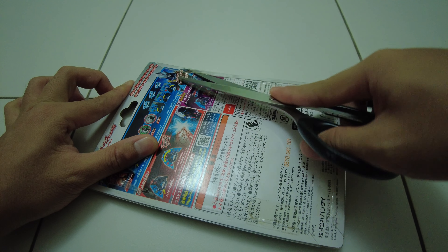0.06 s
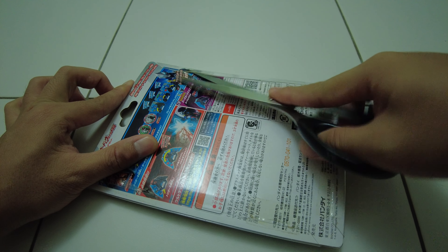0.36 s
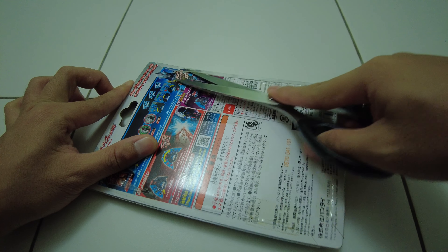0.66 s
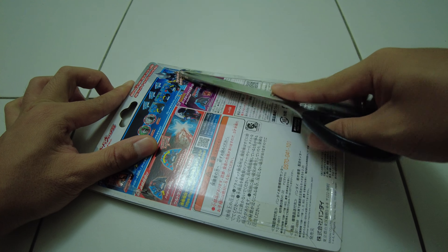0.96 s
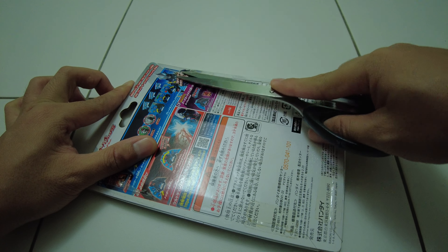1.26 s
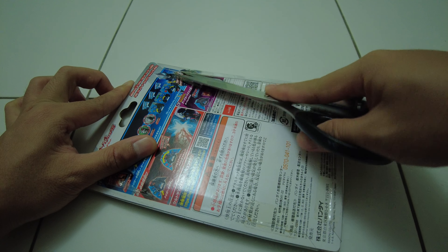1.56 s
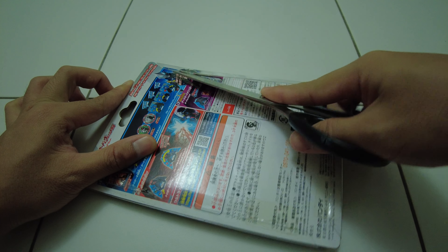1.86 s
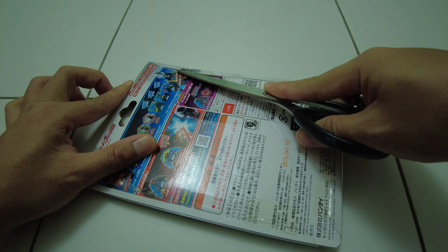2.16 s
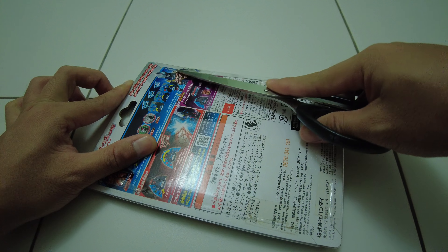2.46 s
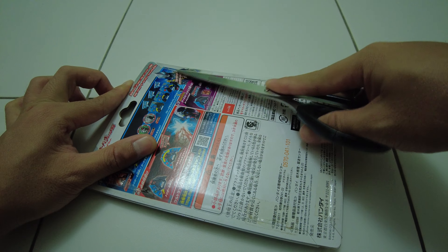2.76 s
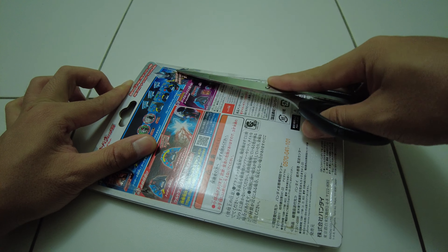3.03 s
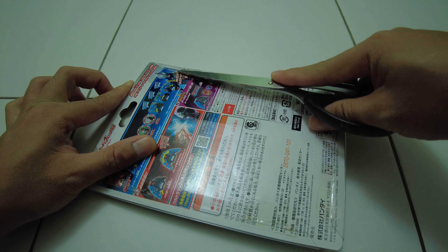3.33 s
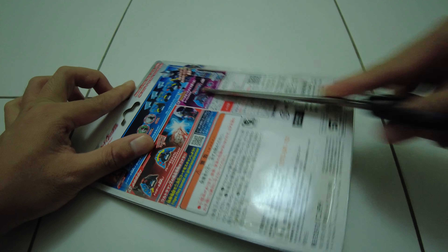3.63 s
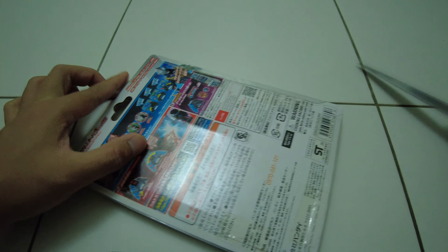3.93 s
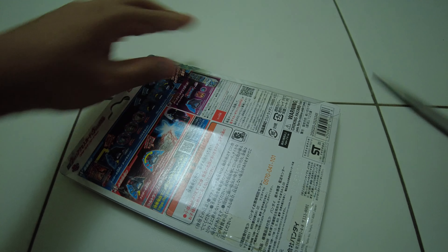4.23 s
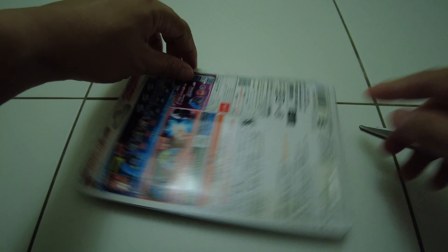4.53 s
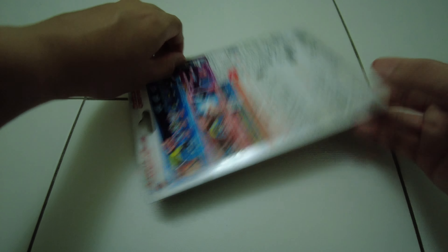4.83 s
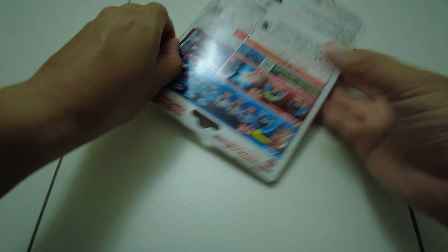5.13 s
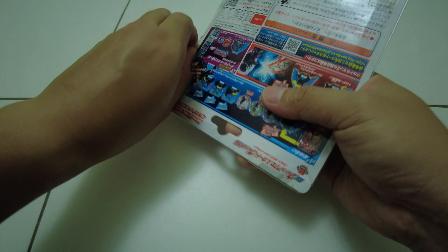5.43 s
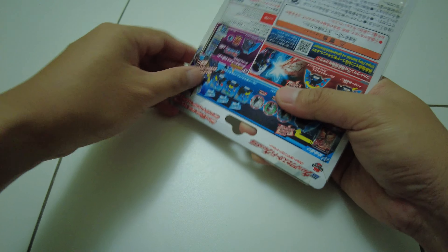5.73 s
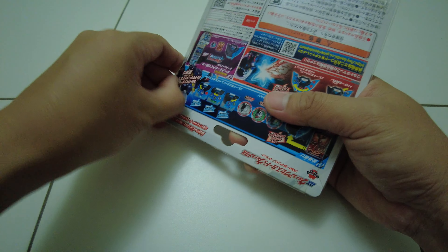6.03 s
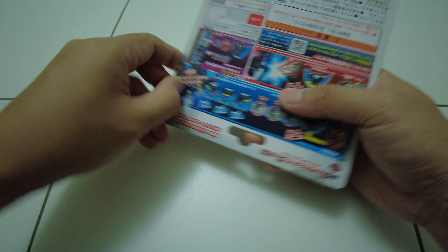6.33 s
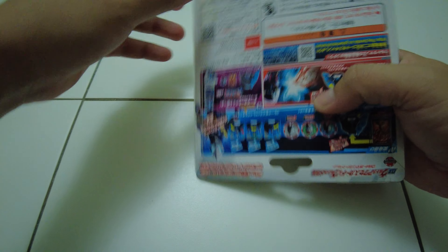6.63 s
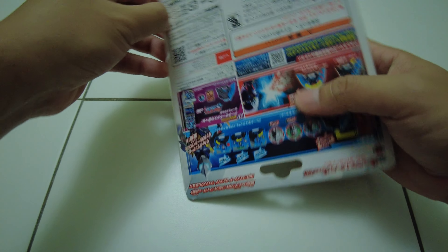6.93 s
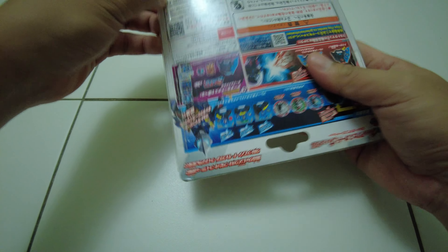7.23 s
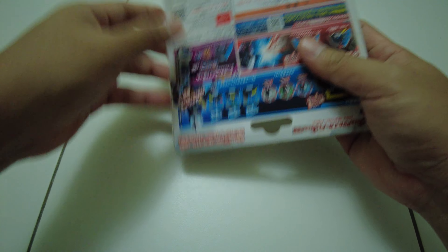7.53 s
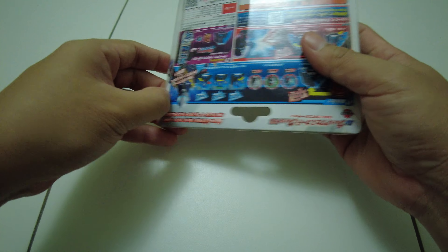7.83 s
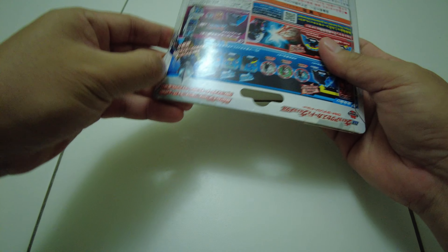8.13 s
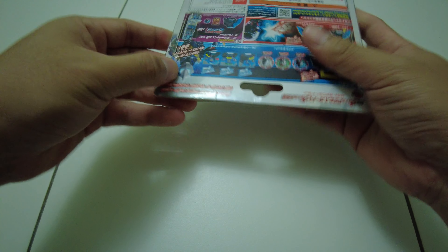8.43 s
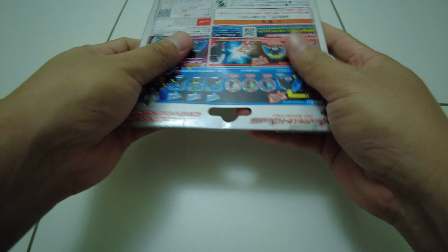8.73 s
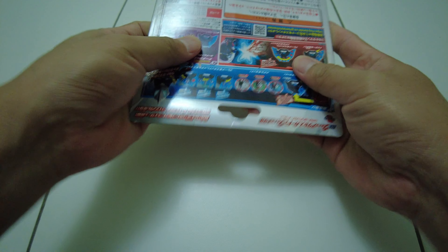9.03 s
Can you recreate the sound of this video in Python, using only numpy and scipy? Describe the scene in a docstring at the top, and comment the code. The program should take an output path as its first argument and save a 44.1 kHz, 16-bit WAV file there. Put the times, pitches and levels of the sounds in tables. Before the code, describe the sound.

Soft chewing of scissor blades on stiff packaging grows into four crackling snips and a tug with a light thump. The scissors clatter onto tile and scrape a short way. Then the plastic pack is handled, with one sharp pop, light rubbing and scattered small clicks. Everything is close, in a small echoing tiled room with a steady low rumble and hum.

```python
"""Steel scissors chew, then snip through a card and plastic pack, close to the microphone.
Each bite shears the card in tiny jerks that make the pack ring, while its fibres crackle.
The scissors are pulled free, put down on floor tiles with a clink and slid away.
Hands turn and flex the pack: it rustles as it rubs, clicks as it buckles, and its dome pops once.
A small tiled room echoes it all, over a low rumble and hum."""
import sys
import numpy as np
from scipy import signal
from scipy.fft import rfft, irfft
from scipy.io import wavfile

SR = 44100
rng = np.random.default_rng(int(sys.argv[2]) if len(sys.argv) > 2 else 0)


def store_wav(level_fs):
    """Save 16-bit WAV to argv[1]."""
    pcm = np.round(np.clip(np.atleast_2d(level_fs), -1, 1) * 32767)
    wavfile.write(sys.argv[1], SR, pcm.T.astype(np.int16))


N = 400408
T = np.arange(N) / SR
HZ = np.fft.rfftfreq(4096, 1 / SR)  # the frequencies at which filters are drawn
LEAD_S = .012  # a faint, soft noise swells this long before each click's peak

# Snips, each a grab, then a squeeze until the card breaks: grab t/s, grab level/dB, break t/s,
# squeeze level/dB, break level/dB, squeezed fibres level/dB, strain relative to grab and squeeze/dB
SNIPS = [(2.307, -32.5, 2.475, -30, -39, -48.5, -12.5), (2.6085, -32, 2.7063, -30.5, -30.5, -49.5, -27.5),
         (2.842, -28.5, 3.0292, -29.5, -32.5, -43.5, -12), (3.131, -29, 3.2397, -31, -25, -37.5, -11.5)]
# Tone colour of the plastic sheet: f/Hz, level/dB
SHEET = [(80, -28), (300, -15), (550, -6), (900, -3), (1600, -1.5), (2100, -7), (3100, -5.5), (4200, -23.5),
         (8000, -34.5), (16000, -48.5)]


def cutting():
    """Each bite shears the card in jerks that ring the pack; fibres crackle and edge scrapes on edge."""
    jerks = grit(per_s=1800, spread_db=4, apart=.4)
    body, tear_power, wiping = np.zeros((2, N)), np.zeros(N), np.zeros(N)
    for s, card_db, rise_s, fall_s, fibre_db in bites():
        near = abs(T - s) < .25
        bite = np.exp(np.minimum((T[near] - s) / rise_s, (s - T[near]) / fall_s))
        shear = unit(through(bite * jerks[:, near], pack_ring(1 + 0.0151 * rng.uniform(-1.3, 1))))
        add(body, T[near][0], gain_of(card_db) * np.linalg.norm(bite) * shear)
        tear_power[near] += (gain_of(fibre_db) * bite) ** 2
        wiping[near] = np.maximum(wiping[near], gain_of(-65.5) * bite)
    wiping += np.sqrt(stroke_power([(3.42, .09, -64)]))  # the blades ease open after the last snip
    for grab_s, grab_db, break_s, _, break_db, _, _ in SNIPS:
        for s, db in [(grab_s, grab_db - 8.5), (break_s, break_db)]:  # the edges catch, the card breaks
            snap = noisy_click(t60=0.011, share=1.0, lead=0.83, channels=1)
            add(body, s - LEAD_S, blow(db, through(snap, pack_ring(0.9815))))
    # Tone colour of tearing fibres: f/Hz, level/dB
    fibres = [(200, -40), (1900, -1), (3000, 5), (3900, -4.5), (4700, -1.5), (7000, -5.5), (10000, -12),
              (16000, -10)]
    crackle = through(np.sqrt(tear_power) * grit(per_s=800, spread_db=4, apart=1), tone_filter(fibres))
    scrape = through(wiping * grit(per_s=640, spread_db=2.5, apart=1), filter_of(peak(3137, width=380)))
    return body + crackle + scrape


def bites():
    """Every push of the blades on the card: t/s, card level/dB, rise/s, fall/s, fibre level/dB."""
    # The blades gnaw at the tough rim without getting through: t/s, level/dB
    gnaws = [(.32, -56.5), (.44, -56), (.58, -55.5), (.69, -57.5), (.89, -54), (1.035, -48.5), (1.30, -60),
             (1.51, -56.5), (1.63, -59.5), (1.745, -55.5), (1.87, -58), (2.0, -56.5), (2.135, -51.5)]
    # The blades are tugged out of the slit: t/s, card level/dB, fibre level/dB
    tugs = [(3.609, -34, -46), (3.624, -31.5, -30.5), (3.658, -34.5, -34), (3.676, -34.5, -36)]
    grab_rise_s, squeeze_fall_s, strain_s, fibre_offset_db = 0.0037, 0.00558, 0.0265, -18.5
    for s, db in gnaws:
        yield s, db, 0.0283, 0.0285, db - 8.5
    for grab_s, grab_db, break_s, squeeze_db, _, fibre_db, strain_db in SNIPS:
        squeeze_s = break_s - 0.00421
        # a weaker strain fades after the sharp grab and builds again toward the squeeze
        fading_db, building_db = grab_db + strain_db, squeeze_db + strain_db
        yield grab_s, grab_db, grab_rise_s, .014, grab_db + fibre_offset_db
        yield grab_s, fading_db, grab_rise_s, strain_s, fading_db + fibre_offset_db
        yield squeeze_s, building_db, strain_s, squeeze_fall_s, building_db + fibre_offset_db
        yield squeeze_s, squeeze_db, 0.0106, squeeze_fall_s, fibre_db
    for s, db, fibre_db in tugs:
        yield s, db, 0.0058, 0.01013, fibre_db


def pack_ring(pitch_ratio):
    """The ring of the pack, its notes shifted by where it is gripped."""
    # Notes of the pack held in the blades: f/Hz, width/Hz, level/dB
    notes = [(536.3, 217, -16.5), (828, 148, -0.52), (1023.6, 115, 1), (1321.2, 160, -3.5), (1529, 170, -5),
             (3053, 580, -24.5), (4660, 300, -27)]
    return filter_of(sum(gain_of(db) * peak(hz * pitch_ratio, width) for hz, width, db in notes))


def scissors_on_tile():
    """Blows and a gritty slide shake the blades: a hard clack and a short ring, damped by the tile."""
    # Steel strikes tile: t/s, level/dB, time for its noise to fade by 60 dB/s
    clinks = [(4.0026, -20.5, 0.0161), (4.0233, -26, 0.026), (4.0309, -30.5, 0.096), (4.189, -28, 0.039),
              (4.3298, -20.5, .014), (4.354, -32.5, .03), (4.376, -37, 0.0094), (4.3924, -44.5, 0.017)]
    # Notes of the blades: f/Hz, level/dB
    blades = [(1205, -10.5), (2860, -5), (3273, -7), (4392, -8.5), (4995, -8.5), (5426, -7.5), (6459, -5.5),
              (7665, -2.5), (9388, -6), (10335, -3), (10852, -2), (12403, -3), (14728, -3.5), (15073, -4),
              (15590, -1)]
    # Tone colour of the clack: f/Hz, level/dB
    steel = [(100, -25.5), (800, -20.5), (2200, -8.5), (2900, -1.5), (4200, -4.5), (6500, 2), (9000, 0),
             (12500, 3.5), (15700, 3)]
    drive = sliding()
    for s, db, t60 in clinks:
        add(drive, s - LEAD_S, blow(db, noisy_click(t60, share=4.5, lead=0.0504)))
    t = np.arange(SR // 4) / SR
    ring = sum(gain_of(db) * np.sin(2 * np.pi * (hz * t + rng.random((2, 1)))) for hz, db in blades)
    response = gain_of(-17) * unit(ring * fade(t, t60=0.077))
    blade_peaks = sum(gain_of(db) * peak(hz, width=115) for hz, db in blades)
    add(response, 0, tone_filter(steel, boost=1.93 * blade_peaks))
    left, right = through(drive, response)
    # the highest notes reach the far, left microphone weakest
    shade = filter_of(gain_of(-3 * (HZ / HZ[-1] * 2) ** 2))
    return np.array([gain_of(-2) * through(left, shade)[0], gain_of(2) * right])


def sliding(from_s=4.298, to_s=4.4085, sag_db_per_s=21.5):
    """The scissors are pushed over gritty tile, slow down as they go and coast to a stop."""
    # Tone colour of the grit under the blades: f/Hz, level/dB
    tile_grit = [(1000, 1), (2400, -1), (3000, 6), (4200, 1.5), (9000, 1), (13000, 2)]
    attack = np.exp(np.minimum(T - from_s, 0) / .006)
    sag = gain_of(-sag_db_per_s * np.maximum(T - from_s, 0))
    release = np.exp(-np.maximum(T - to_s, 0) / 0.0445)
    friction = gain_of(-32.5) * attack * sag * release * grit(per_s=2900, spread_db=3.5, apart=1.2)
    return through(friction, tone_filter(tile_grit))


def popping(at_s=5.4705):
    """The dome flips in one jerk: a note goes mostly to the microphone, a crack mostly into the room."""
    # Notes of the plastic dome: f/Hz, width/Hz, level/dB
    dome_notes = [(965, 290, -1), (1774, 940, -10.5), (2800, 820, -10), (5294, 1300, -14),
                  (7707, 2400, -1.5), (12500, 4000, -21.5)]
    # Tone colour of the crack: f/Hz, level/dB
    crack_colour = [(200, -30), (900, -7.5), (1650, 2), (2300, -4.5), (3900, -0.5), (5200, 0),
                    (9000, -4), (15000, -10)]
    dome = filter_of(sum(gain_of(db) * peak(hz, width) for hz, width, db in dome_notes))
    note, crack = np.zeros((2, 2, N))
    flip = noisy_click(t60=0.026, share=.8, lead=.4)
    add(note, at_s - LEAD_S, blow(-21.6, through(flip, dome)))
    snap = noisy_click(t60=0.011, share=2, lead=0)
    add(crack, at_s - LEAD_S, blow(-18.5, through(snap, tone_filter(crack_colour))))
    return note + 0.23 * crack, crack + .3 * note


def clicking():
    """Plastic clicks: a bright tick at the crease and a short hollow note from the sheet round it."""
    # Tone colour of the tick: f/Hz, level/dB
    tick_colour = [(200, -32.5), (1500, -32), (3500, -1.5), (6000, 0), (10000, -4.5), (16000, -6.5)]
    base_hz = 1029.7  # SHEET is the colour at this note, and shifts with the note
    out = np.zeros((2, N))
    for s, note_db, note_hz, tick_db, tick_hz in clicks():
        colour = gain_of(read(SHEET, HZ * np.sqrt(base_hz / note_hz)))
        sheet = filter_of(colour * (1 + 2.8 * peak(note_hz, width=note_hz / 3)))
        crease = tone_filter(tick_colour, boost=1.7 * peak(tick_hz, width=1600))
        note = through(noisy_click(t60=0.04, share=1.1, lead=.4, channels=1), sheet)
        tick = through(noisy_click(t60=0.025, share=2.1, lead=0.3), crease)
        add(out, s - LEAD_S, blow(note_db, note) + blow(tick_db, tick))
    return out


def clicks(crease_hz=4464):
    """Every click of plastic: t/s, note level/dB, note f/Hz, tick level/dB, tick f/Hz."""
    # The sheet buckles: t/s, note level/dB, tick level/dB
    buckles = [(0.2724, -54, -74), (0.4526, -42, -52), (.5566, -36.5, -60.5), (0.727, -53.5, -63),
               (0.8572, -46, -66.5), (1.3572, -52, -66), (1.5982, -39, -59), (2.4932, -45, -43),
               (3.5783, -42, -49), (3.624, -34, -35.5), (3.6859, -31, -41), (4.724, -39.5, -55.5),
               (4.7386, -43.5, -58.5), (4.963, -39.5, -49), (5.0403, -46.5, -63.5), (5.351, -42.5, -55.5),
               (5.3938, -39, -47), (5.658, -48.5, -51.5), (6.4508, -49.5, -51.5), (6.7796, -40.5, -47.5),
               (6.8147, -38.5, -49.5), (7.4997, -44, -45.5), (8.768, -53, -61.5)]
    # A stiff edge flicks, hardly moving the sheet: t/s, level/dB, f/Hz
    flicks = [(.068, -60, 8130), (1.397, -56, 14000), (5.2083, -37, 7360), (5.5907, -41.5, 4900),
              (6.0594, -53.5, 4997), (6.8603, -53.5, 14100), (7.0358, -63, 14000), (7.9713, -43, 13600),
              (8.0032, -54, 7800), (8.5093, -58, 14230), (8.7294, -56, 7000), (8.8924, -46.5, 6250)]
    # The plastic scissor handles land and bounce: t/s, level/dB, f/Hz
    handles = [(3.9175, -28.5, 881.3), (3.9508, -36.5, 1570), (3.974, -44, 1630)]
    for s, note_db, tick_db in buckles:
        # small stiff creases, with more tick and less note, tick up to an octave higher
        octaves = np.clip((tick_db - note_db + 6.5) / 9.5, 0, 1)
        yield s, note_db, sheet_pitch(s), tick_db, crease_hz * 2 ** octaves
    for s, db, hz in [*flicks, *stray_flicks()]:
        yield s, db - 13, sheet_pitch(s), db, hz
    for s, db, hz in handles:
        yield s, db, hz, db - 16.5, crease_hz


def stray_flicks(from_s=7.65, to_s=8.2, per_s=8, low_hz=4000, high_hz=13980):
    """Faint flicks at random moments while the pack is flexed: t/s, level/dB, f/Hz."""
    span = to_s - from_s
    for when, size, pitch in rng.random((round(per_s * span), 3)):
        yield from_s + when * span, -63.5 + 3.5 * (2 * size - 1), low_hz * (high_hz / low_hz) ** pitch


def sheet_pitch(s):
    """The sheet's note at time s: the more freely the pack is held, the lower it is."""
    # Pinched in the blades, on the floor, then in the hands: start t/s, f/Hz
    holds = [(0, 1374), (3.4, 1034), (5.62, 760)]
    starts, pitches = np.transpose(holds)
    return pitches[np.searchsorted(starts[1:], s)]


def knocking(thump_s=3.608, thump_hz=260.8):
    """The tug thumps the pack on the floor; later, soft fingertips sound only the sheet's note."""
    # Fingertips tap the pack: t/s, level/dB
    taps = [(6.451, -49), (6.565, -53.5), (6.65, -56.5), (7.08, -57.5), (7.505, -41.5), (7.77, -51.5)]
    out, t = np.zeros((2, N)), np.arange(SR // 4) / SR
    add(out, thump_s, blow(-33, np.sin(2 * np.pi * thump_hz * t) * fade(t, t60=0.082)))
    for s, db in taps:
        touch = noisy_click(t60=.04, share=0.816, lead=0.384, channels=1)
        note = through(touch, filter_of(peak(sheet_pitch(s), width=545)))
        add(out, s - LEAD_S, blow(db, note))
    return out


def rubbing():
    """Skin and tile rub the pack: coarse slips in the sheet, a fine hiss and stray crinkles."""
    # The pack drags over the tiles or through a hand: middle t/s, half length/s, level/dB
    drags = [(4.01, 0.0316, -53.5), (4.655, 0.0416, -45.5), (4.8, 0.19, -56), (4.865, 0.016, -49.5),
             (5.365, 0.0465, -48), (6.63, 0.046, -62.5), (6.81, 0.0275, -49.5)]
    # Fingertips stroke the plastic: middle t/s, half length/s, level/dB
    strokes = [(5.25, 0.21, -66.5), (6.417, 0.0523, -63.5), (6.73, 0.0136, -58.5), (6.965, .09, -67.5),
               (7.725, 0.053, -62.5), (7.992, 0.0172, -56), (8.45, 0.0844, -69), (8.664, 0.02, -58.5),
               (8.8, 0.107, -67)]
    # Tone colour of the hiss: f/Hz, level/dB
    hiss_colour = [(200, -36), (2000, 0), (4000, 3.5), (7500, 3.5), (11000, -6), (16000, -2.5)]
    drag_power, finger_power = stroke_power(drags), stroke_power(strokes)
    sheet_level = np.sqrt(drag_power + gain_of(-2) ** 2 * finger_power)
    hiss_level = np.sqrt(finger_power + gain_of(-12) ** 2 * drag_power)
    sheet = tone_filter(SHEET, boost=0.83 * peak(1034, width=130))
    coarse = through(sheet_level * grit(per_s=410, spread_db=2.5, apart=0.98), sheet)
    rare_slips = grit(per_s=36, spread_db=5.5, apart=0.33)
    crinkles = through(rare_slips, unit(noisy_click(t60=0.0083, share=5.6, lead=0)))
    friction = evened(grit(per_s=730, spread_db=4.5, apart=1) + 0.55 * crinkles)
    return coarse + through(hiss_level * friction, tone_filter(hiss_colour))


def room(x, echoes_per_s=5000):
    """Separate echoes off tiled walls, each frequency band dying at its own speed."""
    # How long the room rings: f/Hz, time to fade by 60 dB/s
    fade_times = [(300, 0.05), (1300, 0.8), (3500, 0.5575), (7000, 0.6), (11000, 0.42), (16000, 0.42)]
    # How loud it answers: f/Hz, level/dB
    levels = [(300, -18), (1000, -20), (1900, -8), (3300, -11), (5500, -10), (8000, -12.5), (16000, -13.5)]
    echoes = rng.standard_normal((2, SR)) * (rng.random((2, SR)) < echoes_per_s / SR)
    hz, t, bands = signal.stft(evened(echoes), SR, nperseg=256)
    t60 = read(fade_times, hz)[:, None]
    decay = fade(t, t60) * np.sqrt(2 * np.log(1000) / (t60 * SR))  # same energy, long or short
    tail = signal.istft(bands * decay * gain_of(read(levels, hz))[:, None], SR, nperseg=256)[1]
    fade_in = np.minimum(T[:tail.shape[1]] / 0.002, 1)
    return through(x, tail * fade_in)


def background(rumble_hz=65):
    """Indoor rumble and hiss, nearly the same on both sides in the bass, with a little low hum."""
    # Tone colour of the steady noise: f/Hz, level/dB
    noise_colour = [(12, -50), (22, -4), (48, -4.5), (98, -8), (163, -7.5), (260, -12.5), (380, -22),
                    (542, -23.5), (802, -29), (1480, -29.5), (3250, -43), (6000, -52.5), (11000, -58),
                    (16000, -57.5)]
    # How alike left and right are: f/Hz, likeness/0-1
    likeness = [(40, 0.94), (150, 0.99), (300, 0.81), (1200, 0), (3000, 0.2), (8000, 0)]
    # Notes of the hum, before the swell: f/Hz, level/dB
    hum_notes = [(48, -55), (77, -61), (120, -57.5)]
    # Rumble and hum swell together: t/s, gain/dB
    swell_points = [(0, -8.5), (.8, 2), (6.5, 0.5), (7.6, 6), (8.6, 5.5), (9.08, 3.5)]
    hz = np.fft.rfftfreq(N, 1 / SR)
    left, other = rfft(rng.standard_normal((2, N)))
    same = read(likeness, hz)
    right = same * left + np.sqrt(1 - same ** 2) * other
    spectrum = np.array([left, right]) * gain_of(read(noise_colour, hz))
    air = gain_of(-46.5) * evened(irfft(spectrum, N))
    swell = gain_of(np.interp(T, *np.transpose(swell_points)))
    rumble = irfft(rfft(air) / (1 + (hz / rumble_hz) ** 4), N)
    hum = sum(gain_of(db) * np.sqrt(2) * np.sin(2 * np.pi * (f * T + rng.random()))
              for f, db in hum_notes)
    return air + rumble * (swell - 1) + hum * swell


def noisy_click(t60, share, lead, channels=2):
    """A sharp click in a short burst of noise; share sets the noise's size, lead the swell before it."""
    t = np.arange(len(HZ) * 2) / SR - LEAD_S
    size = np.where(t < 0, lead * np.exp(-abs(t) / 0.0028), fade(abs(t), t60))
    burst = share * unit(rng.standard_normal((channels, len(t))) * size)
    burst[:, round(LEAD_S * SR)] += 1
    return burst


def slips(per_s, spread_db):
    """Surfaces stick and slip, making random clicks of uneven size."""
    size = gain_of(spread_db * np.clip(rng.standard_normal(N), -2, 2)) * rng.choice([-1, 1], N)
    return evened(size * (rng.random(N) < per_s / SR))


def grit(per_s, spread_db, apart):
    """Fine slips in stereo; apart sets how unlike left and right are."""
    shared = slips(per_s, spread_db)
    sides = np.array([slips(per_s, spread_db) for _ in range(2)])
    return evened(shared + apart * sides)


def stroke_power(rows):
    """Total power of strokes that each swell and fade in a bell shape."""
    return sum(gain_of(db) ** 2 * np.exp(-np.minimum(((T - s) / half) ** 2, 50)) for s, half, db in rows)


def gain_of(db):
    """Turns decibels into a multiplier."""
    return 10 ** (np.asarray(db) / 20)


def fade(t, t60):
    """Dies away by 60 dB every t60 seconds."""
    return np.exp(-np.log(1000) * t / t60)


def evened(x):
    """Scales to an average (rms) level of 1."""
    return x / np.sqrt(np.mean(x ** 2) + 1e-20)


def unit(x):
    """Scales to an energy of 1 per channel."""
    return evened(x) / np.sqrt(x.shape[-1])


def blow(db, x):
    """Gives a short sound the energy of 10 ms at this level."""
    return gain_of(db) * np.sqrt(SR / 100) * unit(x)


def read(points, hz):
    """Looks up a table between its rows, on a log-frequency scale."""
    f, value = np.transpose(points)
    return np.interp(np.log(hz + 1), np.log(f + 1), value)


def peak(hz, width):
    """The bump that one ringing note makes over HZ."""
    return 1 / (1 + ((HZ - hz) / (width / 2 + 1)) ** 2)


def filter_of(gain):
    """The quickest-acting filter (minimum phase) with this shape over HZ, at energy 1."""
    log_gain = np.log(np.maximum(gain, 1e-5))
    mirrored = np.concatenate([log_gain, log_gain[-2:0:-1]])
    return unit(np.fft.ifft(np.exp(np.conj(signal.hilbert(mirrored)))).real)


def tone_filter(colour, boost=0):
    """A filter from a tone colour table; boost lifts chosen notes."""
    return filter_of(gain_of(read(colour, HZ)) * (1 + boost))


def through(x, response):
    """Passes a sound through a filter, channel by channel."""
    return signal.fftconvolve(np.atleast_2d(x), np.atleast_2d(response), axes=1)[:, :x.shape[-1]]


def add(mix, s, sound):
    """Mixes a sound in at time s."""
    part = mix[:, max(round(s * SR), 0):][:, :sound.shape[-1]]
    part += sound[..., :part.shape[1]]


def scene():
    """The pack in the middle, the scissors laid down to the right, the room all round."""
    near = cutting() + clicking() + knocking() + rubbing() + scissors_on_tile()
    pop_near, pop_wide = popping()
    return near + pop_near + room(near + pop_wide) + background()


def record(dry):
    """Cuts off the highest treble, above 16100 Hz."""
    low_pass = signal.firwin(255, 16100, window=("kaiser", 9), fs=SR)
    return signal.oaconvolve(dry, low_pass[None], "same")


dry = scene()
out = record(dry)
store_wav(out)
```